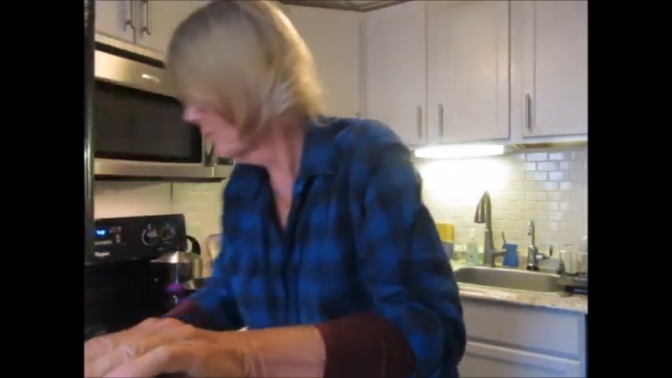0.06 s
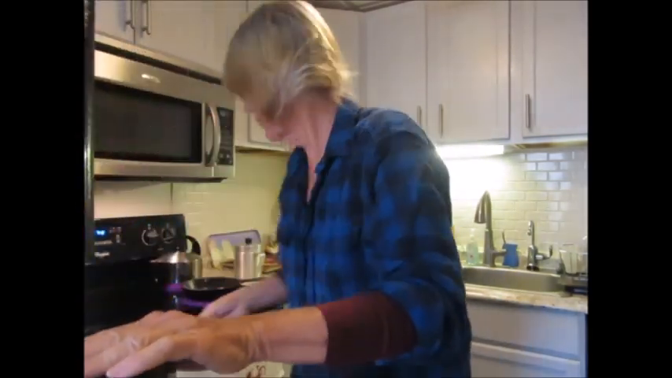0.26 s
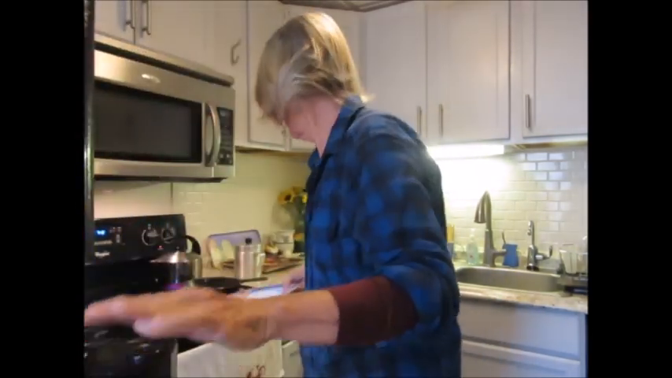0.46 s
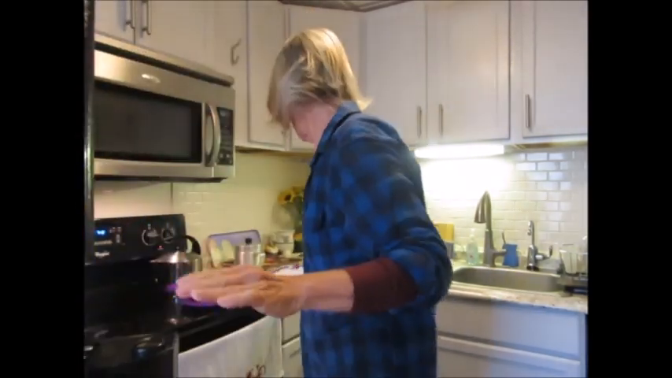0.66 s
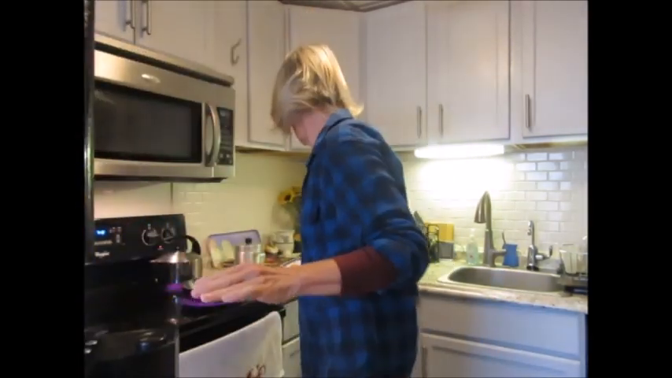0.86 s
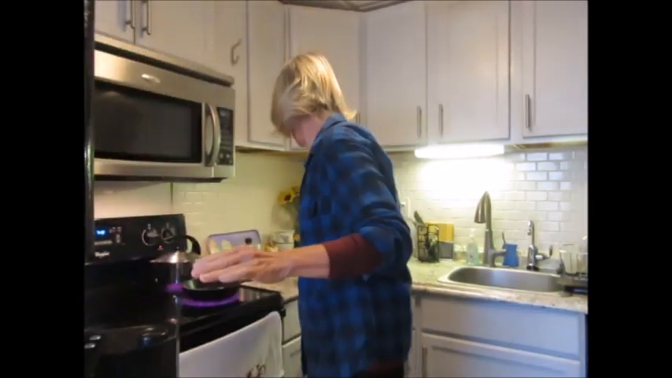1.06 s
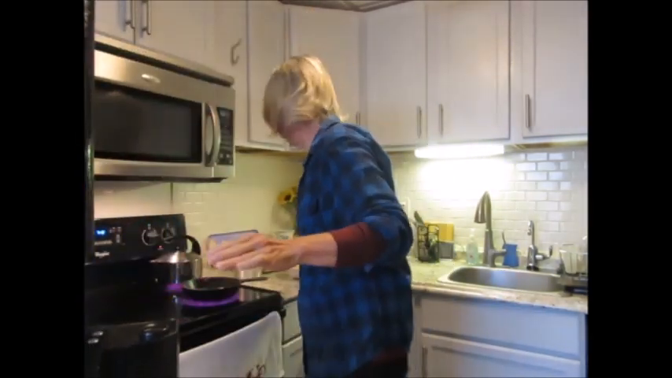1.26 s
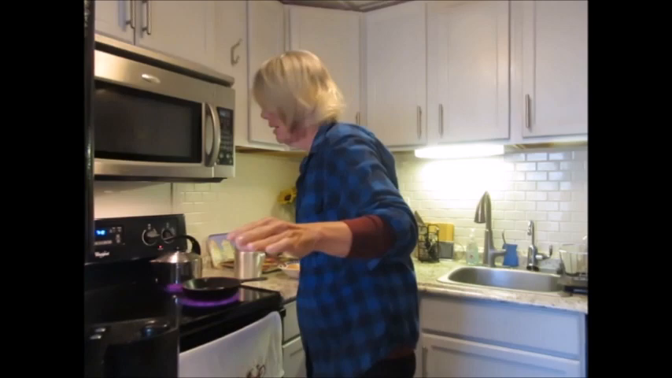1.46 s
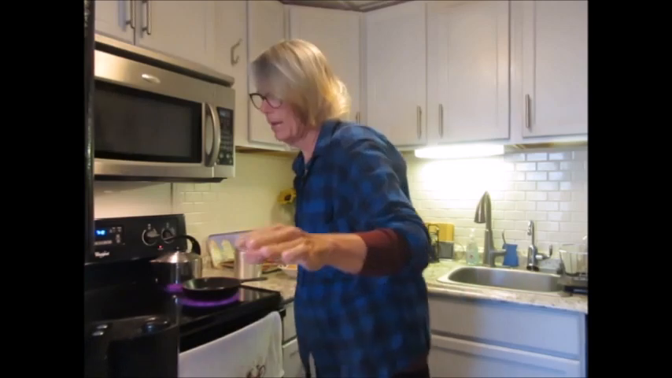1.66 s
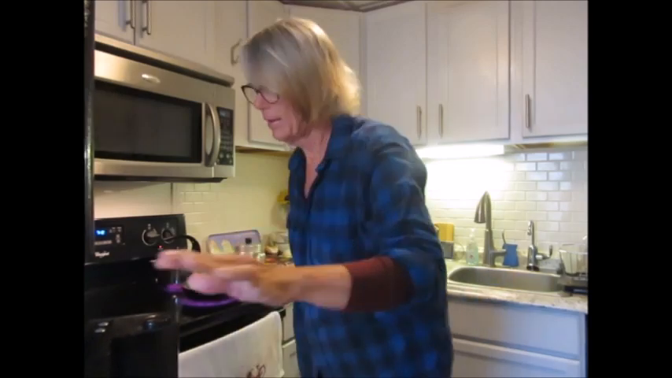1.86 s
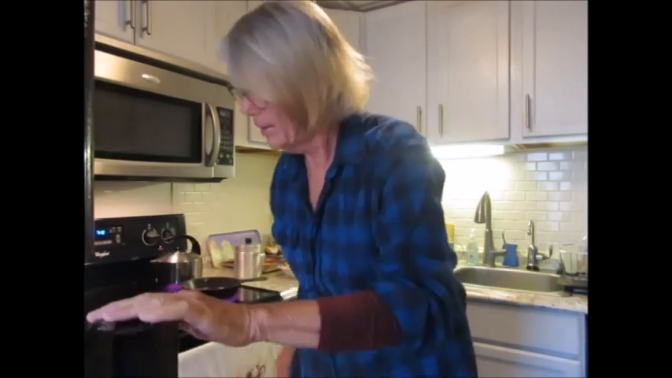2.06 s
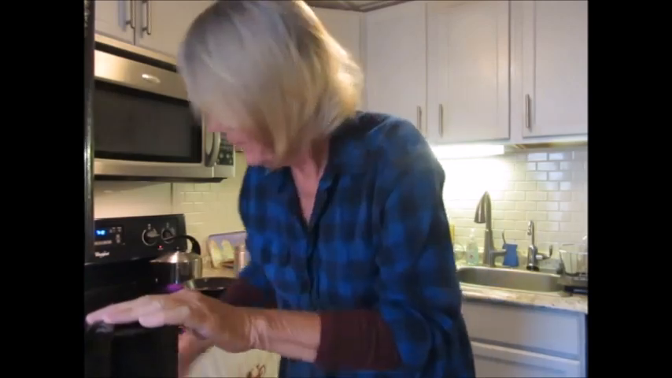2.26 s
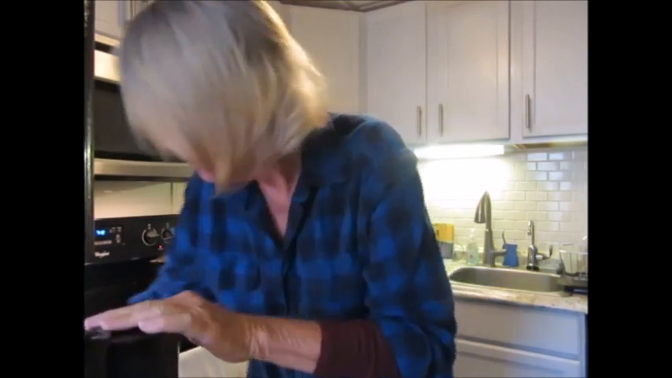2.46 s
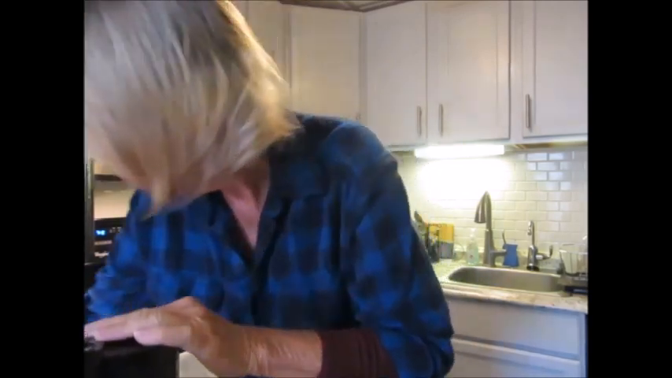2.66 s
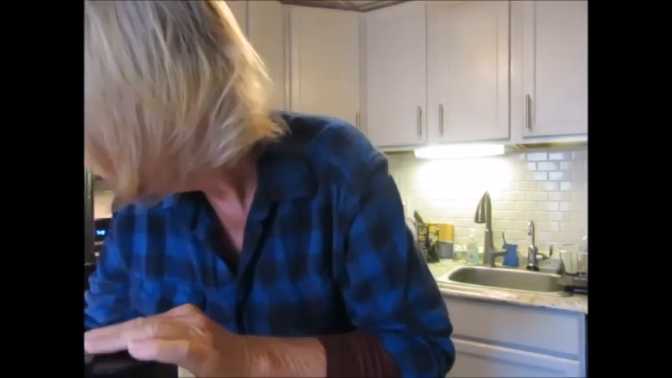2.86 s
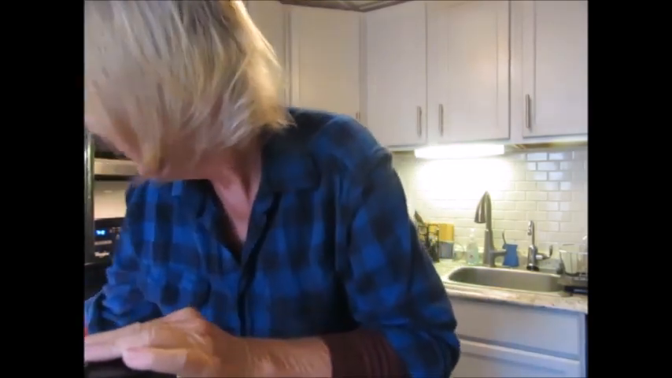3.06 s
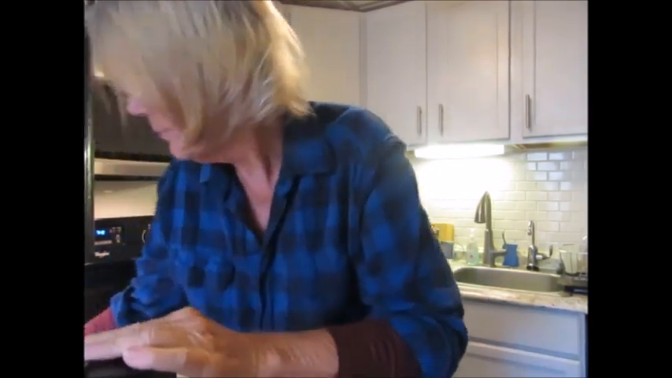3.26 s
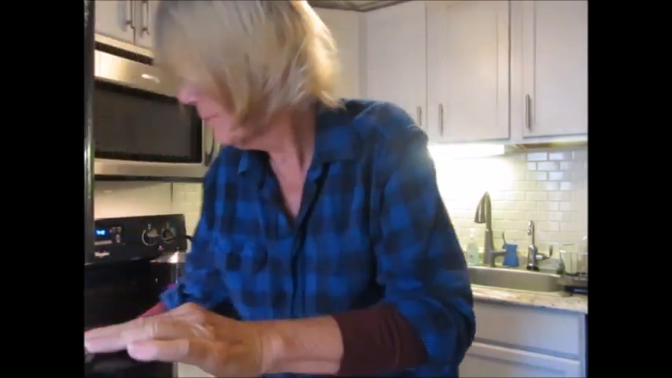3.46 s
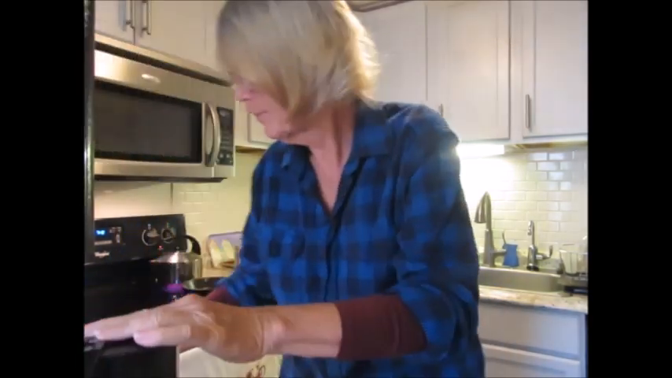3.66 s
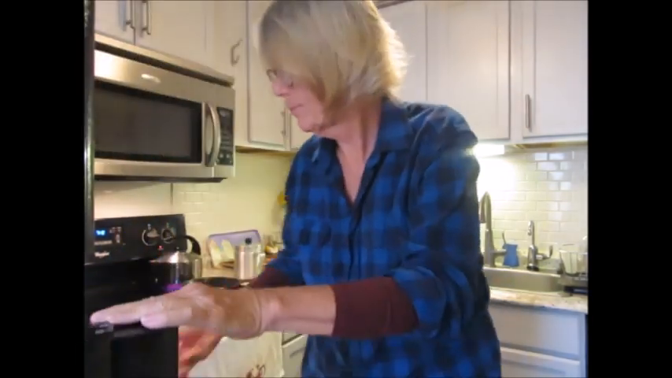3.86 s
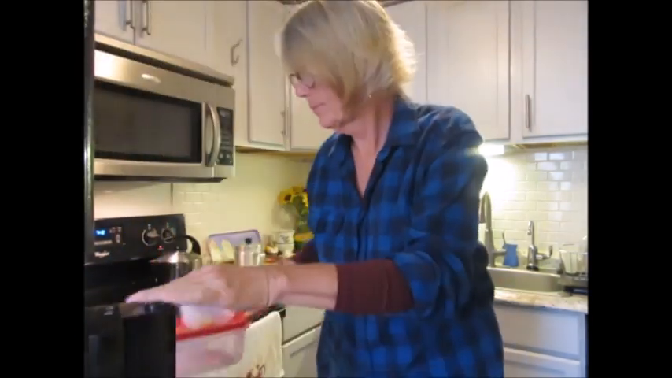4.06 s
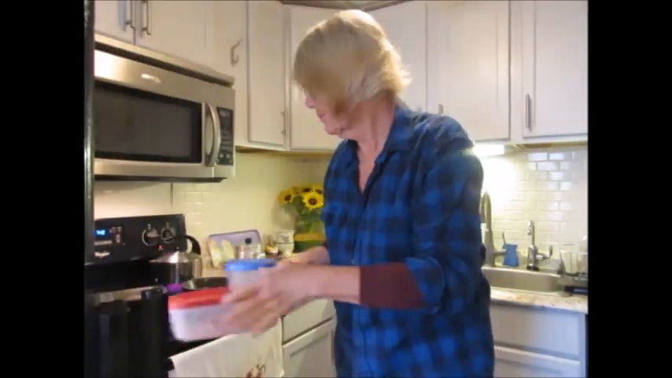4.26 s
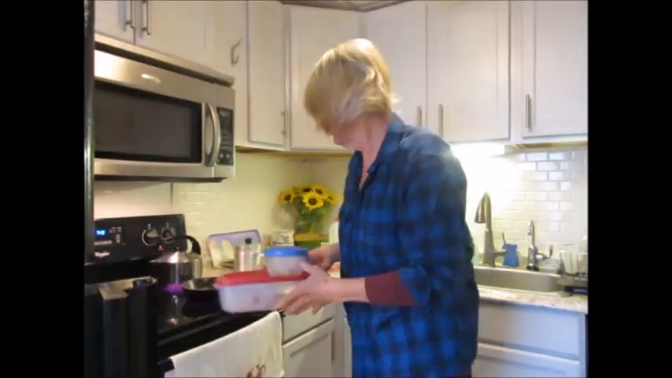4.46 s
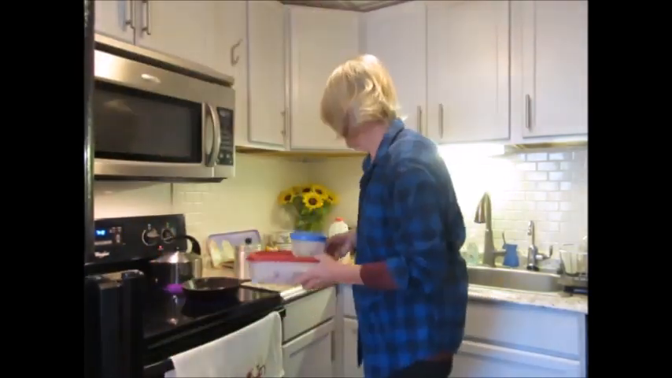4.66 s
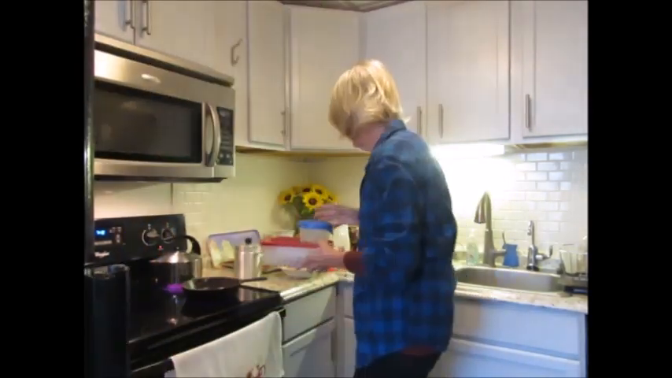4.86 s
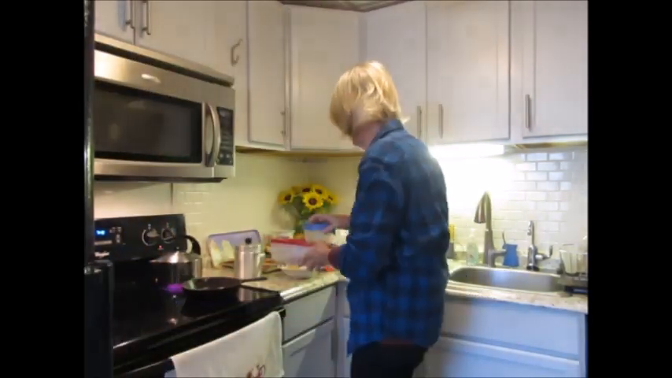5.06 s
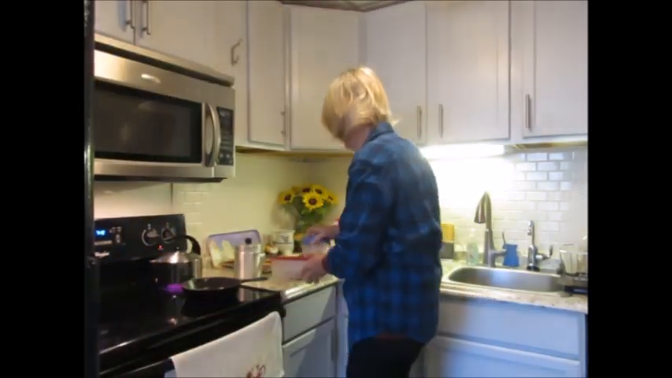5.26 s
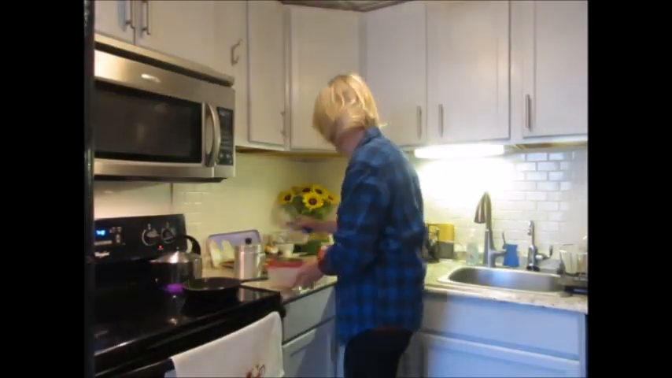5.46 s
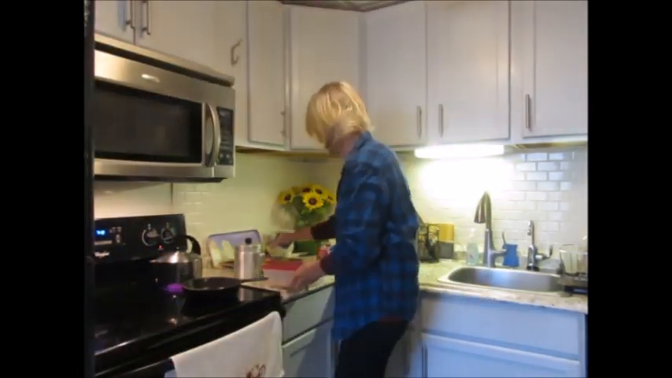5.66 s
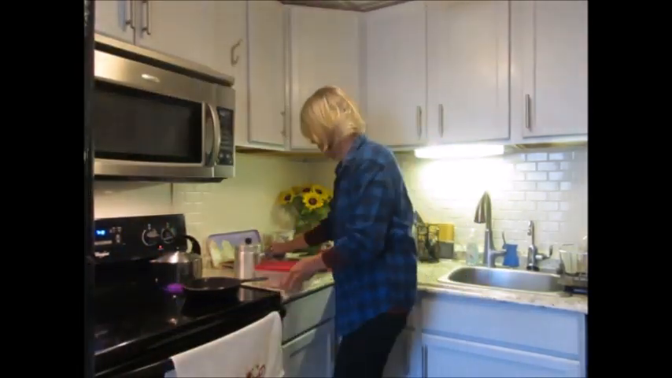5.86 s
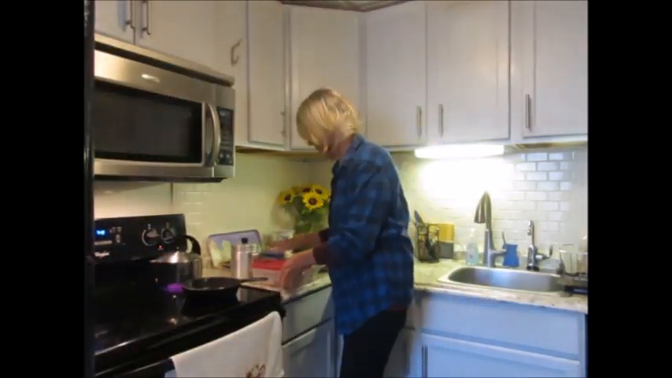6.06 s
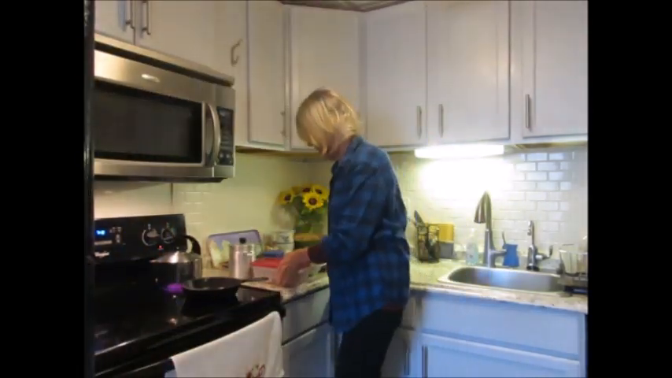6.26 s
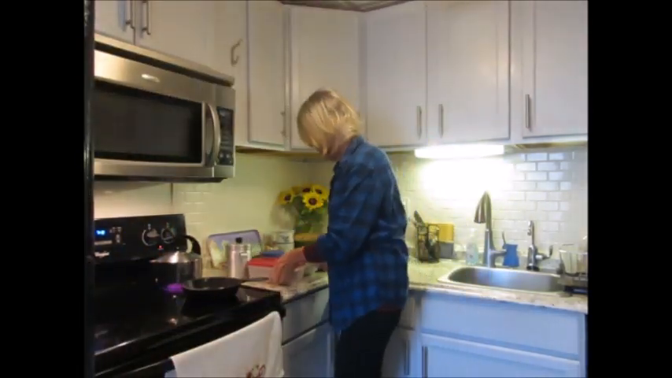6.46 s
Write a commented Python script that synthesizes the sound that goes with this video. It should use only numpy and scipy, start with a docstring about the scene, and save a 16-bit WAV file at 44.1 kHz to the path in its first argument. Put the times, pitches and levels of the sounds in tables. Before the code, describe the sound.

Close kitchen handling: one sharp pan knock, muffled shelf thumps and a jar clink, soft sleeve rustle, then hollow plastic containers stacked and dragged.

```python
"""A pan is set on the stove, things come off refrigerator shelves, a jar clinks and plastic tubs are stacked,
heard by two close microphone ports beside the refrigerator. Each blow is a burst of contacts ringing damped modes.
Shaped noise makes sleeves, dragged plastic, a crinkling lid and the air; feet shift on the boards.
A gliding tone sings between nested tubs, a low push shudders and the compressor hums as a wavering band.
Sparse, fading reflections from tiles and cupboards give a short bright tail."""
import sys
import numpy as np
from scipy import signal
from scipy.fft import rfft, irfft, next_fast_len
from scipy.io import wavfile
from scipy.ndimage import uniform_filter1d

SR = 44100
rng = np.random.default_rng(int(sys.argv[2]) if len(sys.argv) > 2 else 0)


def wrap_up_sound(samples):
    """Save the sound to the file named by the first command line argument, as 16-bit audio."""
    columns = np.atleast_2d(samples).T
    # keep every value between -1 and 1, then stretch to whole-number steps
    tamed = np.clip(columns, -1, 1)
    steps = np.round(tamed * 32767).astype(np.int16)
    wavfile.write(sys.argv[1], SR, steps)


N = 287083


def gain_of(db):
    """Amplitude factor for a level in dB."""
    return 10 ** (np.asarray(db) / 20)


def evened(x):
    """Scales a signal to rms 1."""
    return x / np.sqrt(np.mean(x ** 2) + 1e-20)


def read(points, hz):
    """Reads a (Hz, value) curve along a logarithmic pitch axis."""
    f, value = np.transpose(points)
    return np.interp(np.log(hz + 1), np.log(f + 1), value)


def add(mix, s, sound):
    """Lays a sound into the mix at s seconds, cut off at the end."""
    part = mix[round(s * SR):][:len(sound)]
    part += sound[:len(part)]


def coloured(x, points):
    """Shapes the spectrum of x by (Hz, dB) points."""
    hz = np.fft.rfftfreq(x.shape[-1], 1 / SR)
    return irfft(rfft(x) * gain_of(read(points, hz)), x.shape[-1])


def level(tables):
    """Smoothed gain along the scene from (s, dB) tables, silent outside them."""
    t = np.arange(N) / SR
    gain = 0
    for rows in tables:
        s, db = np.transpose(rows)
        gain = gain + np.interp(t, s, gain_of(db), 0, 0)
    return uniform_filter1d(gain, size=400)


def wander(size):
    """Slow chance of rms 1: noise averaged twice over size samples."""
    once = uniform_filter1d(rng.standard_normal(N), size)
    return evened(uniform_filter1d(once, size))


def causal(gain_db):
    """A spectrum with this gain whose sound starts at time zero (minimum phase)."""
    fold = irfft(np.log(gain_of(gain_db)))
    fold[1:len(fold) // 2] *= 2
    fold[len(fold) // 2 + 1:] = 0
    return np.exp(rfft(fold))


def blows(rows, modes, crack_db, low_db, top_db, full_db, thin_db, sharp_db, follow):
    """A burst of small contacts rings damped modes and a broad crack, then five layers get their strengths."""
    # Edges in Hz of the five layers: thump, body, knock, clack, tick.
    edges = np.array((60, 180, 450, 1500, 4000, 10000))
    centres = np.sqrt(edges[1:] * edges[:-1])
    fullest_hz = 305  # hollow pitch at which the body layer is fullest
    wall_swell = 2.1  # gain that a wall or lid adds at its own pitch
    crack_s = 0.1  # extra decay that makes the crack die sooner than the rattle
    clump_db = 1.5  # contacts bunch unevenly over a few milliseconds
    out, t = np.zeros(N), np.arange(2 ** 14) / SR
    hz = np.fft.rfftfreq(len(t), 1 / SR)
    for s, knock_db, thump_db, clack_db, rattle, hollow_hz, *walls in rows:
        # the body thins as the hollow lies further off; the tick follows the clack
        body_db = full_db - thin_db * abs(np.log2(hollow_hz / fullest_hz))
        tick_db = sharp_db + follow * clack_db
        chance = rng.standard_normal((4, len(t)))
        detune = 1 + 0.015 * chance[2, :len(modes)]
        share_db = 1.8 * chance[2, -len(modes):]

        rise = 1 - np.exp(-t / (0.0014 + 0.085 * rattle))
        fade = rise * np.exp(-t / np.clip(rattle, .002, .06))
        clumps = gain_of(clump_db * evened(uniform_filter1d(chance[3], size=150)))
        strength = 0.42 + (abs(chance[1]) > 2.2)  # a few contacts stand out
        contacts = chance[0] * strength * fade * clumps

        body = 0
        for (f, db, t60), d, e in zip(modes, detune, share_db):
            body = body + gain_of(db + e) / (1 + 2j * (hz - f * d) * t60 / 2.2)
        # the hollow swells what lies near its pitch, broader when high
        narrowness = 12 / (1 + (hollow_hz / 1500) ** 2)
        hollow = 1 + 1.22 / (1 + 1j * narrowness * (hz / hollow_hz - 1))
        for f in walls:
            hollow = hollow + wall_swell / (1 + 16j * (hz / f - 1))
        crack = gain_of(crack_db) * rfft(contacts * np.exp(-t / crack_s))
        ring = (rfft(contacts) * body + crack) * hollow

        # power that each layer has while the rattle lasts, against the power that it should have
        energy = np.diff(np.interp(edges, hz, np.cumsum(abs(ring) ** 2))) / len(t)
        power_db = 10 * np.log10(energy / (SR * (rattle + 0.0026)))
        need_db = knock_db + np.array([thump_db, body_db, 0, clack_db, tick_db]) - power_db
        colour = [(35, need_db[0] + low_db), *zip(centres, need_db), (15000, need_db[-1] + top_db)]
        add(out, s, irfft(ring * causal(read(colour, hz))))
    return out


def air():
    """Distant appliance and microphone noise, sum and difference unrelated."""
    # Spectrum of the air. Each row: pitch in Hz, relative level in dB per Hz.
    spectrum = [(26, -1), (45, -1.5), (100, -4), (140, -5), (176, -11), (373, -11), (935, -17), (2280, -21),
                (7990, -32), (13600, -40.5), (15600, -56)]
    # How far the air spreads between the ports. Each row: pitch in Hz, gain of the difference in dB.
    spread = [(60, -34), (180, -1), (550, 0.5), (15000, -0.5)]
    air_db = -50.5
    noise = evened(coloured(rng.standard_normal((2, N)), spectrum))
    both, apart = gain_of(air_db + 0.88 * wander(3000)) * noise
    return np.array([both, coloured(apart, spread)])


def hum():
    """The compressor: a steady tone plus slow random sway makes a wavering narrow band."""
    # Strength of the hum. Each row: time in seconds, level in dB.
    strength = [(0, -54.5), (2.7, -53.5), (3.6, -63), (4.4, -57.5), (6.51, -71)]
    hum_hz, width_hz = 124.4, 5
    turn = np.exp(2j * np.pi * hum_hz * np.arange(N) / SR)
    r = np.exp(-np.pi * width_hz / SR)
    noise = rng.standard_normal(N) + 1j * rng.standard_normal(N)
    sway = signal.lfilter([1 - r], [1, -r], noise)
    wavering = 1.8 + evened(sway.real) + 1j * evened(sway.imag)
    return level([strength]) * evened((wavering * turn).real)


def swish():
    """Sleeves: fine fibre noise of cloth on cloth in soft strokes, slightly grainy."""
    # Strokes. Each row: time in seconds at its loudest, level in dB, rise in seconds.
    rows = [(.13, -56.5, 0.069), (.3, -51, 0.093), (.72, -63, .02), (2.301, -63, 0.026),
            (2.409, -46, 0.027), (3.93, -56, 0.12), (4.7, -51.5, 0.1), (4.945, -49, 0.027),
            (5.168, -47.5, 0.017)]
    # Spectrum of the cloth. Each row: pitch in Hz, relative level in dB per Hz.
    cloth = [(500, -50), (759, -27), (1100, -15), (1720, -13), (15600, -27)]
    fall_s = 0.051
    t = np.arange(N) / SR
    strokes = np.zeros(N)
    for s, db, rise in rows:
        strokes += gain_of(db) * np.exp(-((t - s) / np.where(t < s, rise, fall_s)) ** 2)
    grain = gain_of(1.5 * wander(60))
    return strokes * grain * evened(coloured(rng.standard_normal(N), cloth))


def pan():
    """The pan on the stove: rattling contacts ring its metal."""
    # Each row: start in seconds, knock in dB, thump and clack in dB above the knock, rattle in seconds,
    # pitch in Hz of the air space or panel under the spot, then pitches in Hz of the walls or lid.
    hits = [(0.391, -51.5, -27, 7.5, 0.017, 1780), (1.448, -13.5, -15, -20, 0.021, 490),
            (1.482, -22, -14, -17, 0.012, 678), (1.588, -19.5, -19.5, -16, 0.028, 475, 990),
            (1.634, -27, -19, -17, 0.018, 480, 1210)]
    # Modes of the pan. Each row: pitch in Hz, relative level in dB, t60 in seconds.
    modes = [(143, 4, 0.15), (232, 6, 0.1), (295, 4, 0.05), (497, 7, 0.028), (690, 1.5, 0.045),
             (985, 5, 0.036), (1230, 6, 0.025), (1720, -7, 0.008), (2850, -14, 0.026), (3930, 2, 0.15),
             (5340, 4, 0.016)]
    # Tone: broad crack in dB, extra gain in dB at the deepest bass and highest treble, fullest body in dB
    # above the knock, its loss in dB per octave, tick in dB above the knock at an even clack, tick dB per clack dB.
    tone = (6, -5, -40, -3, 8.5, -24, 0.9)
    return blows(hits, modes, *tone)


def steps():
    """Feet shift: deep, dull contacts ring the floor boards."""
    # Each row: start in seconds, knock in dB, thump and clack in dB above it, rattle in seconds, hollow in Hz.
    hits = [(2.1, -60.5, 21.6, 0, 0.018, 240), (2.448, -57, 18.5, 0, 0.0087, 62),
            (4.177, -62, 18, -0.5, 0.021, 95)]
    # Modes of the boards. Each row: pitch in Hz, relative level in dB, t60 in seconds.
    modes = [(81.5, -2, 0.13), (133, -7.5, 0.19), (215, -23, 0.043)]
    # Tone in dB, dB per octave and dB per dB, columns as in pan().
    tone = (-34.5, -1, -27, 15, 1, -3.5, -7.5)
    return blows(hits, modes, *tone)


def drag():
    """Plastic over shelf and counter: uneven slips and tiny bumps as noise of changing strength."""
    # One table for each pull. Each row: time in seconds, level in dB.
    pulls = [
        [(2.6, -51), (2.688, -52), (2.8, -44.5)],
        [(5.1, -70), (5.262, -47), (5.37, -57)],
        [(5.62, -26), (5.734, -53), (5.9, -29.5)],
        [(5.96, -35.5), (6.16, -39), (6.45, -41)],
    ]
    # Spectrum of the dragging. Each row: pitch in Hz, relative level in dB per Hz.
    dragged = [(35, -63), (60, -1), (395, -8), (614, -17), (758, -4.5), (2720, -21), (15600, -52.5)]
    slips = rng.standard_normal(N) * gain_of(4.4 * wander(300) + 1.1 * wander(30))
    return level(pulls) * evened(coloured(slips, dragged))


def shelf():
    """Things pulled off the refrigerator shelves: contacts ring the shelf."""
    # Each row: start in seconds, knock in dB, thump and clack in dB above it, rattle in seconds, hollow in Hz.
    hits = [(2.801, -39.5, 1, -3.5, 0.055, 238), (2.825, -27.5, -6, -10.5, 0.025, 685),
            (2.843, -28.5, -4, -15, 0.039, 185), (3.089, -35.5, 13, -5, 0.045, 100),
            (3.184, -39, 17, -9, 0.014, 135), (3.209, -37, 6, -6, 0.03, 110),
            (3.26, -26, -5.5, -3.5, 0.032, 300), (3.303, -27, 0, -18, 0.018, 310),
            (3.326, -30, 0, -18, 0.018, 320), (3.577, -51.5, -2, -12, 0.03, 220),
            (3.71, -50, -3, -10.5, 0.035, 206), (3.8, -53.5, 7.5, 0.5, 0.018, 143)]
    # Modes of the shelf. Each row: pitch in Hz, relative level in dB, t60 in seconds.
    modes = [(100, -4, 0.33), (133.9, 9.5, 0.4), (253.4, 1.5, 0.053), (315, 0.5, 0.16), (405, 5, 0.078),
             (677, -0.5, 0.014), (1180, 4.5, 0.0085), (1930, -22, 0.11), (2680, -10, .04)]
    # Tone in dB, dB per octave and dB per dB, columns as in pan().
    tone = (3, -18, -16, 7, 2.5, -10, 0.82)
    return blows(hits, modes, *tone)


def jar():
    """Clinks of a jar: high, short modes under brief contacts."""
    # Each row: start in seconds, knock in dB, thump and clack in dB above it, rattle in seconds,
    # hollow in Hz, then pitches in Hz of the walls.
    hits = [(3.062, -31.5, 3.5, -4.5, 0.034, 4700, 4400, 4800), (5.157, -61.5, 1, 2, 0.024, 5750)]
    # Modes of the jar. Each row: pitch in Hz, relative level in dB, t60 in seconds.
    modes = [(133, -0.5, 0.11), (1930, -2.5, 0.02), (4450, 3, .006), (4800, 3, 0.006), (6300, 3, .004)]
    # Tone in dB, dB per octave and dB per dB, columns as in pan().
    tone = (1, -16, -13, 18.5, 4.5, 11.5, 3)
    return blows(hits, modes, *tone)


def tubs():
    """Plastic tubs stacked on the counter: contacts ring thin walls and the air inside."""
    # Each row: start in seconds, knock in dB, thump and clack in dB above it, rattle in seconds,
    # hollow in Hz, then pitches in Hz of the walls or lid.
    hits = [(4.537, -57.5, 0, -2, 0.016, 362, 1490), (4.616, -48.5, 2, 1.5, 0.04, 520, 2000),
            (4.649, -46, -8, -15, 0.04, 480, 620), (4.745, -36.5, -8, -12, 0.015, 506),
            (5.063, -45, 3, 3, 0.033, 360, 1950), (5.113, -46, 2, -5, 0.023, 385, 1120),
            (5.289, -41, -3, -8, 0.022, 450, 1100), (5.374, -34.5, -10, 1.5, 0.02, 790, 1250, 3050),
            (5.499, -31, 4.5, -3, 0.045, 260, 3050), (5.598, -23, -3.5, -3, 0.02, 325, 770, 1840),
            (5.724, -29, -10, -3, 0.035, 330), (5.853, -29, 2, -9, 0.037, 540, 1220),
            (5.913, -17.5, -34.5, -5.5, 0.015, 430, 1066, 1550, 2600),
            (6.004, -33.5, -6, -6, 0.02, 440, 4300), (6.082, -26, -20, -19, 0.02, 600, 986),
            (6.169, -41.5, -16, -11, 0.019, 533, 1010), (6.281, -36, -11, -12.5, 0.051, 616, 1250),
            (6.412, -38, -21, -11, 0.021, 343, 1300), (6.452, -22.5, -14, -14, 0.032, 1000, 1450, 1620)]
    # Modes of the tubs. Each row: pitch in Hz, relative level in dB, t60 in seconds.
    modes = [(94, -4, 0.11), (184.7, 8, 0.16), (327, 8, 0.06), (400.5, 5, 0.08), (503, 3.5, 0.026),
             (738, 2.5, 0.04), (1228, -5, 0.064), (1529, 1, 0.05), (1870, -18, 0.061), (2580, -16, 0.03)]
    # Tone in dB, dB per octave and dB per dB, columns as in pan().
    tone = (5.5, -11, -19.5, 6, 8, -14.5, 0.9)
    return blows(hits, modes, *tone)


def nested():
    """Air between two sliding tubs: a rising tone whose pitch and strength waver with the rubbing."""
    # Each row: time in seconds, pitch in Hz and level in dB, both before the wavering.
    glide = [(5.1, 383, -51), (5.27, 400, -57), (5.31, 430, -42), (5.37, 450.6, -53), (5.44, 453, -47),
             (5.48, 462, -62)]
    s, hz, db = np.transpose(glide)
    pitch = np.interp(np.arange(N) / SR, s, hz) * (1 + 0.014 * wander(300))
    turns = np.cumsum(pitch) / SR
    return level([np.transpose([s, db])]) * (wander(500) + 1) * np.sin(2 * np.pi * turns)


def shudder():
    """Counter and cupboards under a heavy landing: a low push that dies within a few swings."""
    # Each row: start in seconds, level in dB.
    landings = [(5.499, -23)]
    swing_hz, decay_s = 27, 0.04
    out, t = np.zeros(N), np.arange(SR // 2) / SR
    for s, db in landings:
        add(out, s, -gain_of(db) * np.exp(-t / decay_s) * np.sin(2 * np.pi * swing_hz * t))
    return out


def crinkle():
    """A lid crinkles under the fingers: clumped grains in a high band."""
    # Strength of the crinkling. Each row: time in seconds, level in dB.
    strength = [(6.16, -62), (6.18, -54.5), (6.3, -55.5), (6.36, -70)]
    # Band that it fills. Each row: pitch in Hz, relative level in dB per Hz.
    band = [(2800, -30), (3600, 4), (4900, 1), (5500, -36)]
    grains = rng.standard_normal(N) * gain_of(3.6 * wander(40))
    return level([strength]) * evened(coloured(grains, band))


def kitchen(x):
    """Sparse reflections of random sign, each band dying at its own speed; two unrelated tails."""
    # Reverberation of the kitchen. Each row: pitch in Hz, t60 in seconds.
    decay = [(100, 0.6), (300, 0.46), (1000, 0.43), (3000, 0.39), (8000, 0.37)]
    taps = np.zeros((2, SR))
    at = np.arange(130, SR - 20, 20) + rng.integers(0, 20, (2, (SR - 131) // 20))
    np.put_along_axis(taps, at, rng.choice([-1., 1.], at.shape), 1)
    hz, t, z = signal.stft(taps, SR, nperseg=256)
    fade = gain_of(-60 * t / read(decay, hz)[:, None])
    tail = signal.istft(z * fade, SR, nperseg=256)[1]
    return signal.fftconvolve(x[None], tail / np.linalg.norm(tail[0]), axes=1)[:, :N]


def scene():
    """Sum and difference of the two ports are built first, then turned into left and right."""
    # How far near sounds and tail spread. Each row: pitch in Hz, gain of the difference in dB.
    spread = [(60, -36), (250, -24), (1000, -19), (2000, -13.5), (4000, -5), (8000, 0.5), (12000, 7),
              (15000, 8)]
    near = pan() + shelf() + tubs() + steps() + jar()
    near = near + swish() + drag() + nested() + crinkle()
    both, apart = gain_of(-5.0) * kitchen(near)
    # a small time gap between the ports puts the direct sound a quarter cycle off in the difference
    quarter_off = signal.hilbert(near, next_fast_len(N))[:N].imag
    apart = coloured(apart + .5 * quarter_off, spread)
    both, apart = np.array([both + near + hum() + shudder(), apart]) + air()
    return np.array([both + apart, both - apart])


def record(dry):
    """The band limit of the recorder: a steep low-pass."""
    edge_hz = 15620
    lowpass = signal.firwin(1023, edge_hz, window=("kaiser", 9), fs=SR)
    return signal.oaconvolve(dry, lowpass[None], "same")


dry = scene()
out = record(dry)
wrap_up_sound(out)
```